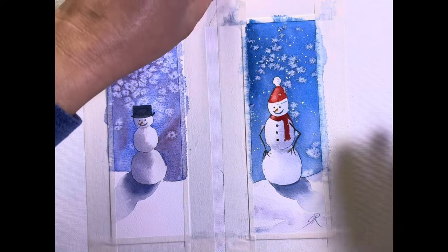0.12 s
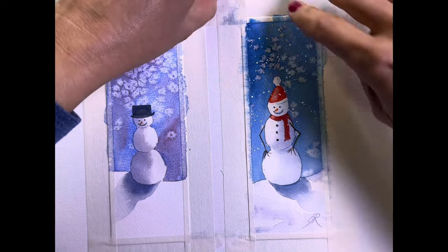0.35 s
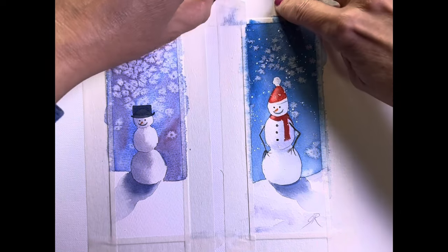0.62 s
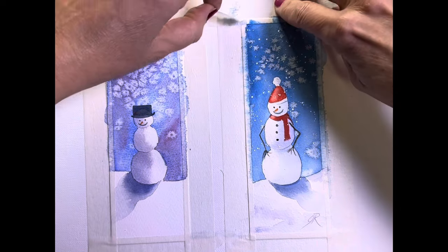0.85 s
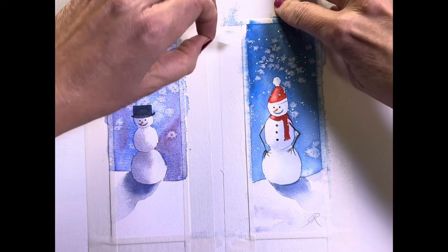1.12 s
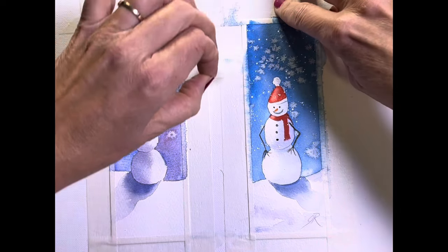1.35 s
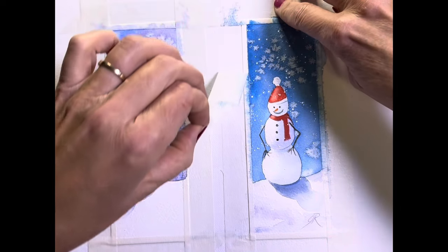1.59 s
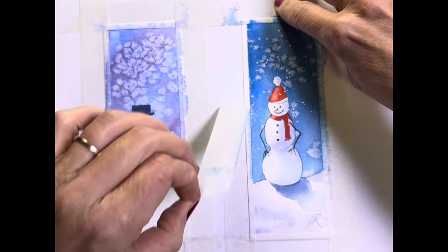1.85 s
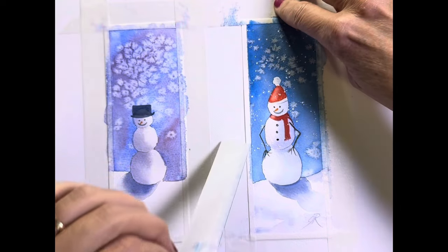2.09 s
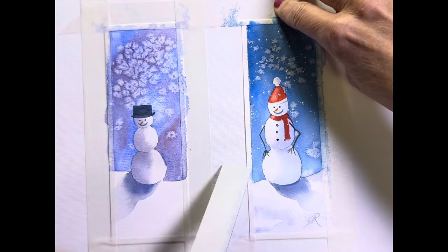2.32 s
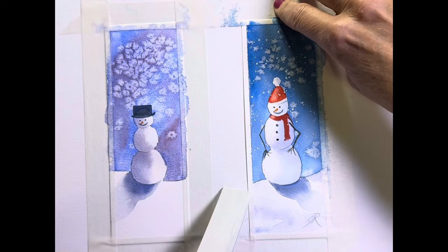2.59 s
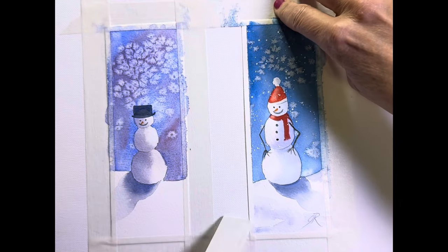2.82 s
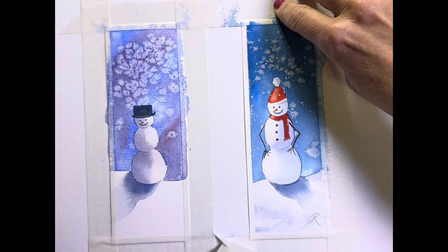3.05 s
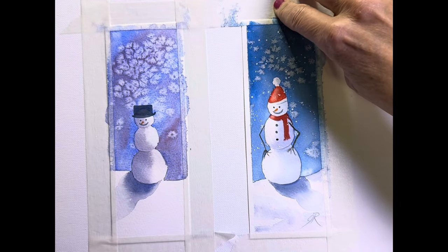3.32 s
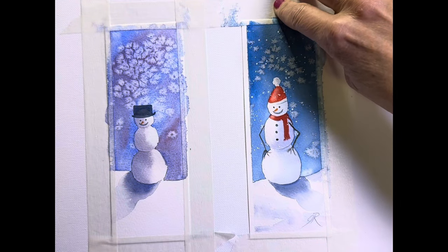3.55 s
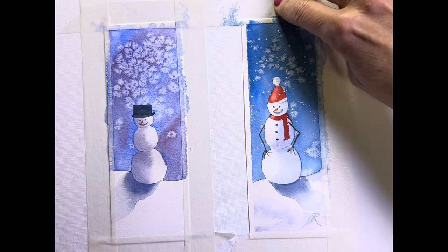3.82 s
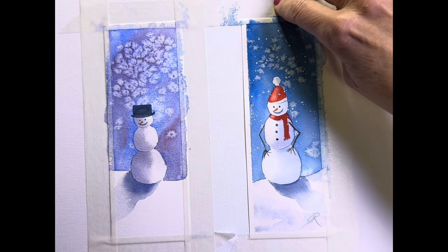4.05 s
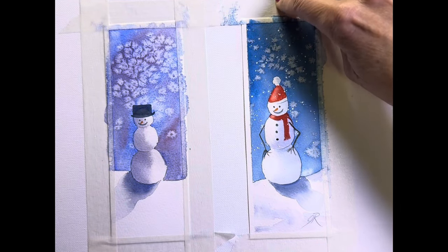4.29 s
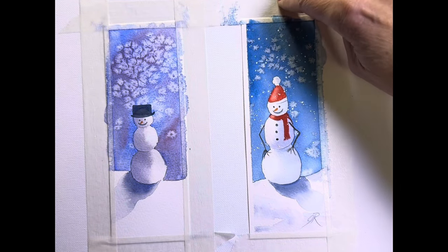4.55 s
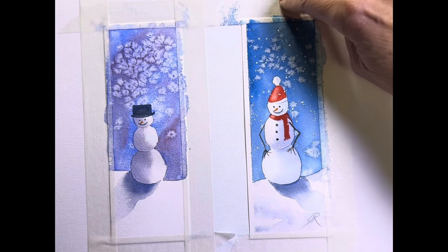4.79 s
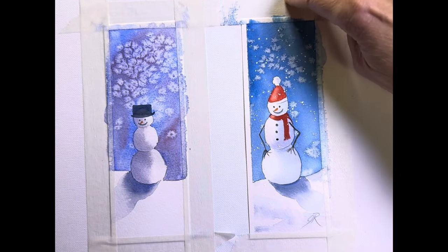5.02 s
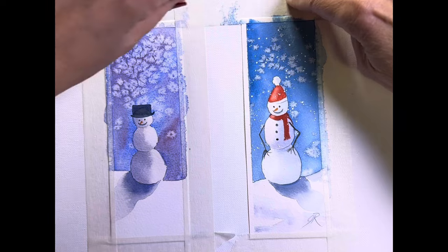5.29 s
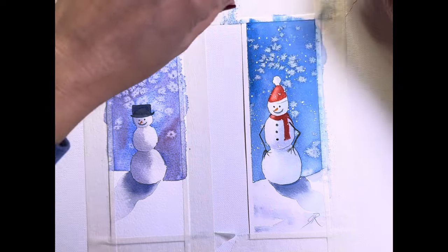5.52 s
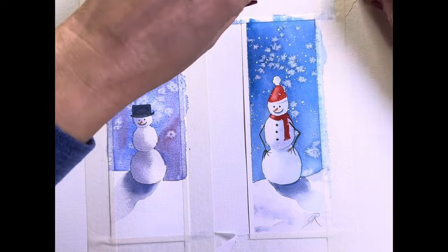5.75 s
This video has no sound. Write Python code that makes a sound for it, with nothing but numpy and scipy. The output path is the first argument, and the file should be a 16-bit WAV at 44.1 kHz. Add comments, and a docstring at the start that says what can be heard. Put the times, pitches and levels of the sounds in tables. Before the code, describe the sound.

A small, quiet room with barely audible air and low hum, heard close in stereo. In the first 0.15 s fingers tap the paper sheet softly, with another faint tap near 0.45 s. From about 0.4 s tape starts to let go: separate dry snaps with papery thuds, spaced out until 1.0 s, with a short gap before 1.06 s. The snaps then quicken, and from 1.5 to 3.3 s they merge into a dense, bright, grainy ripping crackle, broken by tiny stalls, notably around 2.55 and 3.1 s, with the strongest crack near 2.98 s. The table shudders faintly underneath. The peel ends abruptly at about 3.3 s, with two tiny ticks at 3.45 s. Then the loose strip rustles faintly from 3.8 s, with crisp ticks at 4.02, 4.34 and 4.5 s. Near silence follows, with faint brushes at 4.96 and 5.3 s.

```python
"""Adhesive tape is peeled off paper on a board, close under two microphone ports, in a small quiet room.
The glue lets go in stick-slip: each slip is a dry noise crack and a dispersive bending wave in the
sheet whose treble arrives first, while the pull shakes the table and the board rings faintly.
Afterwards the loose strip rustles and ticks, as enveloped noise and short cracks.
Filtered noise makes the room air and a faint low hum throughout."""
import sys
import numpy as np
from scipy import signal
from scipy.fft import rfft, irfft, next_fast_len
from scipy.io import wavfile
from scipy.ndimage import uniform_filter1d

SR = 44100
rng = np.random.default_rng(int(sys.argv[2]) if len(sys.argv) > 2 else 0)


def wav_record(signal):
    """Record a signal, one row per channel, as 16-bit PCM in the file named by sys.argv[1]."""
    frames = np.transpose(np.atleast_2d(signal))
    bounded = np.clip(frames, -1, 1)
    # unit amplitude maps onto the largest positive 16-bit level
    quanta = np.round(bounded * 32767).astype(np.int16)
    wavfile.write(sys.argv[1], SR, quanta)


def how_loud(loudness_db):
    """Turn decibels into a plain amplitude multiplier (0 dB gives 1, 20 dB gives 10)."""
    steps = np.asarray(loudness_db, float) / 20
    return 10 ** steps


N = 259749
T = np.arange(N) / SR
SIZE = next_fast_len(N + SR)
HZ = np.arange(SIZE // 2 + 1) * SR / SIZE

# Crack colour as heard, band-limited near 16 kHz. Each row: frequency in Hz, relative level in dB.
CRACK_COLOUR = [(500, -7.5), (1200, 1), (1560, -10.5), (1820, -4.5), (4400, -4), (5050, -11.5),
                (5500, -2.5), (8500, -5), (10300, -9), (12100, -25), (15900, -15), (16300, -43.5),
                (16900, -91.5)]
# Spectrum of bending waves in the sheet. Each row: frequency in Hz, relative level in dB.
SHEET_SPECTRUM = [(90, -32), (150, 0.5), (290, 0.5), (400, 4.5), (640, 5), (880, 4.5), (1500, -6.5),
                  (3000, -13.5), (5000, -51.5)]


def along(table):
    """Interpolation on a logarithmic frequency axis: the table's second column at every bin."""
    table = np.array(table, float)
    return np.interp(np.log(HZ + 1), np.log(table[:, 0]), table[:, 1])


def shape(x, response):
    """Linear filtering: the spectrum is multiplied by a frequency response."""
    return irfft(rfft(x, SIZE) * response, SIZE)[..., :N]


def unit(x):
    """Power normalisation: scales to rms 1."""
    return x / np.sqrt(np.mean(x ** 2))


def train(s, gain):
    """Impulse excitation: one impulse of the given gain at each time s in seconds."""
    return np.bincount(np.clip(s * SR, 0, N - 1).astype(int), gain, N)


def fade(x, tau_s):
    """First-order relaxation: an exponential tail after every impulse."""
    return signal.lfilter([1], [1, -np.exp(-1 / (tau_s * SR))], x)


def noise_tail(envelope):
    """Diffuse response: the spectrum of noise under an envelope, with unit energy."""
    tail = envelope * rng.standard_normal(len(envelope))
    return rfft(tail / np.sqrt(np.sum(tail ** 2)), SIZE)


def swarm(per_s, spread_db):
    """Random point process: event times and sizes, many small, few large, none huge."""
    chance = rng.random((int(per_s * N / SR), 2))
    s = chance[:, 0] * N / SR
    size = how_loud(-spread_db * np.log(1 - 0.84 * chance[:, 1]))
    return s, size


def background():
    """Stationary noise: room air in mid and an unrelated side, and two narrow bands that waver as a hum."""
    # Air spectrum. Each row: frequency in Hz, relative level in dB.
    air_spectrum = [(25, -16), (45, 8), (150, -6.5), (270, -14), (900, -29), (2600, -22.5), (4900, -32),
                    (10000, -42), (12000, -59.5)]
    # Hum bands. Each row: centre in Hz, width at half amplitude in Hz, level in dB.
    hum_bands = [(58.4, 2.7, -63.5), (111.4, 12, -69)]
    air_db = -65
    mid, side = shape(rng.standard_normal((2, N)), how_loud(along(air_spectrum)))
    air = how_loud(air_db) / np.std(mid)
    # relative to the mid, the side is strongest near 700 Hz
    side_over_mid = [(60, -29.0), (200, -7.5), (700, 8.0), (2400, -13.5), (12000, 5.0)]  # (Hz, dB)
    side = shape(side, how_loud(along(side_over_mid)))
    hum = 0
    for hz, width_hz, db in hum_bands:
        band = 1 / (1 + ((HZ - hz) / width_hz * 2) ** 2)
        hum = hum + how_loud(db) * unit(shape(rng.standard_normal(N), band))
    return np.array([air * mid + hum, air * side])


def bending(far):
    """Dispersion: bending waves travel like sqrt(f), a falling chirp, longer from further off (far 0-1)."""
    reach_near, reach_far = .08, .13  # chirp stretch, turns per sqrt Hz
    reach = reach_near + far * (reach_far - reach_near)
    wave = how_loud(along(SHEET_SPECTRUM)) * np.exp(-2j * np.pi * (reach * np.sqrt(HZ) - rng.random()))
    # the lowest waves fade on a long way
    wave = wave * HZ ** 4 / (HZ ** 4 + (far * 310.0) ** 4 + 1)
    # returns from the edges of the sheet give each spot its own short ring
    ring = noise_tail(np.exp(-np.arange(SR // 20) / SR / .005))
    wave = wave * (1 + how_loud(-8.0) * ring)
    return wave / np.abs(irfft(wave, SIZE)).max()  # peak 1


def cracks(s, crack, thud, tau_s, tail_s, tail_db, count=10):
    """Sudden release: a crack in the air and a thud along the sheet, coloured by one of count spots."""
    nearest_s = 2.0  # when the peel front is nearest the ports
    colour_db = 3.5  # spread between spots
    # early spots lie far up the sheet, later ones near the ports
    far = np.clip(1 - s / nearest_s, 0, 1)
    spot = (count * (far + rng.random(len(s))) / 2).astype(int)
    age = np.arange(SR // 20) / SR
    # the crack swells and dies quickly, then fibres frizz on
    burst = age / tau_s * np.exp(1 - age / tau_s) + how_loud(tail_db) * np.exp(-age / tail_s)
    air = how_loud(along(CRACK_COLOUR)) * np.sqrt(tau_s * SR)
    out = 0
    for k in range(count):
        here = spot == k
        octaves = np.linspace(9, 14, 11)  # log2 of Hz
        tint = how_loud(colour_db * np.interp(np.log2(HZ + 1), octaves, rng.standard_normal(11)))
        out = out + rfft(train(s[here], thud[here]), SIZE) * bending(k / count)
        snap = noise_tail(burst) * air * tint
        snap = snap * np.linalg.norm(air) / np.linalg.norm(snap)  # tint leaves the energy alone
        out = out + rfft(train(s[here], crack[here]), SIZE) * snap
    return irfft(out, SIZE)[:N]


def finger_taps():
    """Impact excitation: fingers tap the sheet, mostly before the pull."""
    # Each row: time in seconds, thud level in dB.
    taps = [(0.018, -32.5), (0.025, -29.5), (0.0415, -32.5), (0.0744, -45), (0.102, -32), (0.137, -37),
            (0.447, -37.5)]
    crack_over_thud_db = -5
    s, db = np.transpose(taps)
    return cracks(s, how_loud(db + crack_over_thud_db), how_loud(db), .00035, .006, -8, count=4)


def large_slips(s, crack_db, thud_db):
    """Stick-slip: the largest releases of the glue, as cracks and thuds."""
    crack_gain_db, thud_gain_db = 4.5, 6.5
    crack = how_loud(crack_db + crack_gain_db)
    thud = how_loud(crack_db + thud_db + thud_gain_db)
    return cracks(s, crack, thud, .0005, .004, -13, count=20)


def small_slips(s, size, big_s, big_db, crackle_db):
    """Load transfer: small slips crowd in after each large one and hold off just before it."""
    # The tape sticks and the crackle stalls. Each row: start in seconds, length in seconds.
    stalls = [(1.541, 0.014), (2.063, 0.044), (2.164, 0.024), (2.37, 0.035), (2.517, 0.085), (2.878, 0.04),
              (3.045, 0.16)]
    stall_db, follow_db, hush, knock_scatter_db = -8.5, -21.5, .5, 4.5
    # a large slip loads the glue next to it
    crowd = how_loud(follow_db) * fade(train(big_s, how_loud(big_db)), 0.0068)
    # reversed in time, so that the hush builds up to the slip
    before = fade(train(big_s, np.ones(len(big_s)))[::-1], 0.012)[::-1]
    holds = 1 - np.clip(hush * before, 0, 1)
    stuck = sum(1. * (T > start) * (T < start + length) for start, length in stalls)
    stuck = uniform_filter1d(stuck, int(0.0043 * SR))
    busy = crowd + holds * how_loud(crackle_db + stall_db * stuck)
    size = size * busy[(s * SR).astype(int)]
    snap = size * how_loud(12.5)
    knock = size * how_loud(knock_scatter_db * rng.standard_normal(len(s)) + 1.0)
    return cracks(s, snap, knock, .0003, .003, -10, count=16)


def table_shake(s, size, big_s, big_db, shake_db):
    """Structure-borne sound: every slip jolts the table into low noise, the large ones most."""
    # Table spectrum. Each row: frequency in Hz, relative level in dB.
    table_spectrum = [(22, -38.5), (45, 1.5), (60, 3.5), (190, -2), (500, -49.5)]
    tugs = train(big_s, how_loud(big_db + 28.0))
    jolts = unit(fade(train(s, size) + tugs, 0.02)) * rng.standard_normal(N)
    return unit(shape(jolts, how_loud(along(table_spectrum)))) * how_loud(shake_db)


def board_ring(struck):
    """Modal resonance: the board rings near its free edge, less as the peel moves away from it."""
    # Each row: frequency in Hz, width in Hz, gain at the centre in dB.
    modes = [(1800, 76, -0.5), (565, 160, 3.5)]
    fall_s = 1
    ring = sum(how_loud(db) / (1 + 2j * (HZ - hz) / width_hz) for hz, width_hz, db in modes)
    return shape(np.exp(-T / fall_s) * struck, ring)


def peel():
    """Stick-slip peeling: taps, large slips, small ones around them, board ring and shaking table."""
    # The largest glue slips. Each row: time in seconds, crack level in dB before gain,
    # thud over crack in dB before gain.
    slip_rows = [(0.398, -40.5, -27), (0.4592, -36.5, -5), (0.5103, -21.5, -6.5), (0.5647, -31, -8),
                 (0.6361, -18.5, -7.5), (0.6601, -26, -9.5), (0.6855, -30.5, -6.5), (0.7628, -18.5, -3),
                 (0.7804, -16, -5), (0.8544, -14.5, -6), (1.0639, -25.5, -7), (1.0923, -21.5, -7),
                 (1.1724, -21.5, -6.5), (1.216, -17, -12.5), (1.2434, -17, -11), (1.265, -14, -15),
                 (1.3019, -15.5, -15), (1.3154, -13, -16), (1.3752, -13.5, -13.5), (1.4247, -15, -11),
                 (1.4406, -13, -10.5), (1.4837, -16.5, -10.5), (1.493, -21, -6), (1.5088, -20, -4.5),
                 (1.569, -16.5, -9.5), (1.601, -16, -8), (1.6207, -15.5, -13), (1.6396, -15, -5.5),
                 (1.6729, -13, -8), (1.6892, -11, -15), (1.7046, -18.5, -11.5), (1.7308, -18.5, -7.5),
                 (1.7539, -17.5, -5.5), (1.7685, -17.5, -6.5), (1.79, -17.5, -6.5), (1.8274, -18.5, -9.5),
                 (1.8445, -15.5, -13), (1.8511, -12.5, -14), (1.865, -19.5, -11), (1.8851, -14, -9),
                 (1.9046, -12.5, -11.5), (1.9095, -15, -12.5), (1.94, -14, -20), (1.9717, -19.5, -6.5),
                 (1.9856, -10.5, -20.5), (2.0037, -12, -14), (2.007, -14, -11), (2.0218, -13.5, -6),
                 (2.0453, -11.5, -14.5), (2.1149, -13.5, -11.5), (2.1258, -15.5, -7.5), (2.1336, -11, -10),
                 (2.1882, -18.5, -5), (2.2189, -13, -16.5), (2.2751, -14, -13.5), (2.2855, -15, -14.5),
                 (2.3313, -21.5, 0.5), (2.36, -16, -10), (2.4005, -17.5, -3), (2.41, -15, -10.5),
                 (2.4551, -20, -20.5), (2.5264, -17, -7), (2.6386, -13, -7), (2.6482, -15, -5.5),
                 (2.675, -14, -14), (2.7374, -14.5, -7.5), (2.7898, -10.5, -16), (2.8027, -21.5, -7.5),
                 (2.827, -11, -11), (2.8585, -13.5, -14.5), (2.8724, -16.5, -8), (2.9504, -9.5, -19.5),
                 (2.9826, -6, -12.5), (3.0161, -13, -11.5), (3.025, -12, -17.5), (3.0418, -13.5, -15),
                 (3.1442, -12, -4.5), (3.1505, -13.5, -11), (3.1722, -12, -13.5), (3.1814, -17, -9),
                 (3.1942, -14.5, -7.5), (3.2385, -16.5, -10), (3.2491, -14, -17.5), (3.2658, -17, -11.5),
                 (3.2775, -17, -6), (3.2991, -15.5, -12.5), (3.3115, -20.5, -6)]
    # Uneven pull. Each row: time in seconds, fine crackle drive in dB, shake of the table in dB.
    pull = [(0, -44, -42.5), (.17, -64, -58.5), (.27, -62.5, -65), (0.331, -104, -104), (0.451, -54.5, -61),
            (0.799, -53, -45), (1.028, -45, -59.5), (1.302, -39.5, -49), (1.698, -27.5, -41.5),
            (2.3, -32.5, -40.5), (2.75, -30, -37.5), (2.999, -46, -45), (3.299, -32, -46.5),
            (3.33, -60, -41), (3.399, -83.5, -58.5)]
    big_s, big_db, thud_db = np.transpose(slip_rows)
    at, crackle_db, shake_db = np.transpose(pull)
    crackle_db = np.interp(T, at, crackle_db, right=-150)
    shake_db = np.interp(T, at, shake_db, right=-150)
    s, size = swarm(240, 2.4)
    slips = large_slips(big_s, big_db, thud_db) + small_slips(s, size, big_s, big_db, crackle_db)
    struck = slips + finger_taps()
    return struck + board_ring(struck) + table_shake(s, size, big_s, big_db, shake_db)


def strip_ticks():
    """Buckling: the loose strip ticks as it creases, each crease brightest around its own pitch."""
    # Each row: time in seconds, tick level in dB before the filter, low knock over tick in dB,
    # brightest frequency in Hz.
    ticks = [(3.4412, -26.5, -3, 7980), (3.4611, -29, -4.5, 5960), (4.024, -11.5, -39, 8360),
             (4.3421, -11.5, -26, 6090), (4.5003, -18.5, -25, 8200), (4.508, -20, -18, 7480)]
    out = 0
    for s, tick_db, knock_db, hz in np.array(ticks)[:, :, None]:
        tick = cracks(s, how_loud(tick_db), how_loud(tick_db + knock_db), 0.00025, 0.007, -2.0, count=1)
        out = out + shape(tick, how_loud(-32.5) + how_loud(-3.0) / (1 + ((HZ - hz) / 2130.0) ** 2))
    return out


def strip_rustle():
    """Friction noise: the loose strip brushes against fingers as a fine, grainy hiss."""
    # Each row: start in seconds, length in seconds, level in dB, lowest hiss frequency in Hz,
    # gain of the paper scuff under the hiss in dB.
    touches = [(3.772, 0.124, -65.5, 1450, -15), (4.011, 0.061, -67, 4040, -12),
               (4.124, 0.045, -61, 4700, -17.5), (4.068, 0.04, -73, 3950, 6),
               (4.23, 0.034, -70, 4000, 13.5), (4.254, 0.062, -68, 4450, -13),
               (4.334, 0.057, -51, 3040, -16.5), (4.471, 0.086, -65.5, 3450, -12),
               (4.592, 0.11, -77.5, 4500, -32), (4.959, 0.026, -71, 3985, 16),
               (5.316, 0.03, -58.5, 3050, -2)]
    s, size = swarm(1000, 5.3)
    grain = fade(train(s, size), 0.0075) * rng.standard_normal(N)
    out = 0
    for start, length, db, low_hz, scuff_db in touches:
        touch = uniform_filter1d(1. * (T > start) * (T < start + length), int(0.019 * SR))
        # skin hisses in the treble while the paper under it scuffs softly
        hiss = how_loud(along(CRACK_COLOUR)) * HZ ** 4 / (HZ ** 4 + low_hz ** 4)
        scuff = how_loud(along(SHEET_SPECTRUM) + scuff_db)
        out = out + how_loud(db) * touch * unit(shape(grain, hiss + scuff))
    return out


def moving_tail(x, envelope):
    """Reverberation of a moving source: unit-energy echoes whose pattern changes from place to place."""
    place_s = .2  # the peel front and the hands take this long to reach a new place
    step = int(place_s * SR)
    window = np.sqrt(signal.get_window("hann", 2 * step))
    x = np.pad(x, (step, 2 * step))
    out = np.zeros(len(x) + len(envelope) + step)
    for start in range(0, N + step, step):
        tail = envelope * rng.standard_normal(len(envelope))
        piece = signal.fftconvolve(x[start:start + 2 * step] * window, tail / np.linalg.norm(tail))
        out[start:start + len(piece)] += piece
    return out[step:step + N]


def scene():
    """Mid-side superposition: sources and their room tail at two close ports, as left and right."""
    # Difference between the ports. Each row: frequency in Hz, side over mid in dB.
    port_level = [(60, -34.5), (700, -14), (1300, -25), (3500, -20), (5000, -3.5), (6300, -22),
                  (7500, -7.5), (9500, -2.5), (12000, 14.5), (15500, -1)]
    # Each row: frequency in Hz, side phase in turns.
    port_phase = [(900, .33), (1300, .25), (6000, .25), (6600, -.25)]
    room_t60_s, room_db, diffuse_db = 0.21, -6.5, -4.5
    near = peel() + strip_ticks() + strip_rustle()
    age = np.arange(SR // 2) / SR
    decay = how_loud(-60 * age / room_t60_s)
    mid = near + how_loud(room_db) * moving_tail(near, decay * (1 - np.exp(-age / 0.00072)))
    # the room tail arrives from all round, so the ports differ by another draw of it
    around = near + how_loud(room_db) * moving_tail(near, decay)
    # hands and table scatter the sound a little differently to each port
    around = around + how_loud(diffuse_db) * moving_tail(around, np.exp(-age / 0.027))
    # the side starts 3 dB stronger and settles
    around = around * how_loud(3.0 * np.exp(-T / .9))
    side = shape(around, how_loud(along(port_level)) * np.exp(2j * np.pi * along(port_phase)))
    mid, side = np.array([mid, side]) + background()
    return np.array([mid + side, mid - side])


def top_cut(x):
    """Nothing passes above the cut-off."""
    return signal.sosfilt(signal.butter(12, 17000, fs=SR, output="sos"), x)


def record(dry):
    """Signal chain: the finished mix of both ports is stored."""
    return top_cut(dry)


dry = scene()
out = record(dry)
wav_record(out)
```